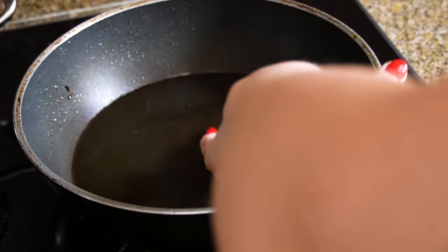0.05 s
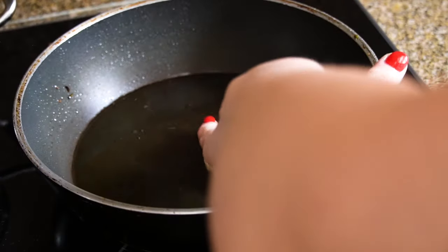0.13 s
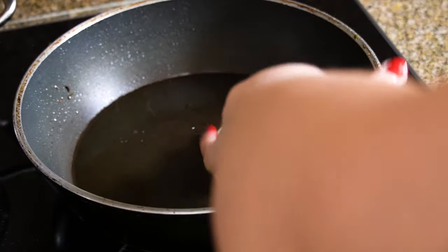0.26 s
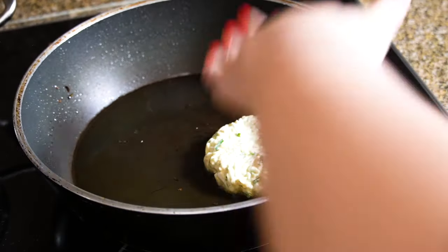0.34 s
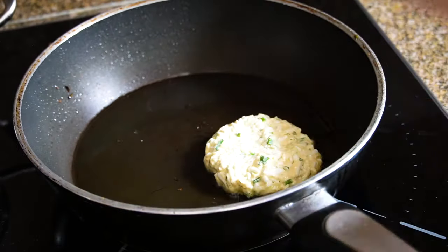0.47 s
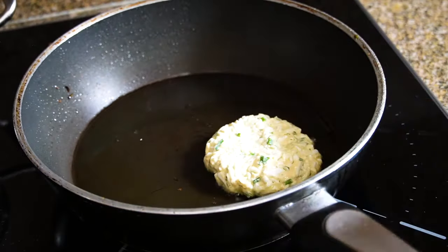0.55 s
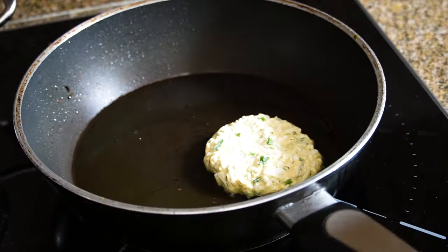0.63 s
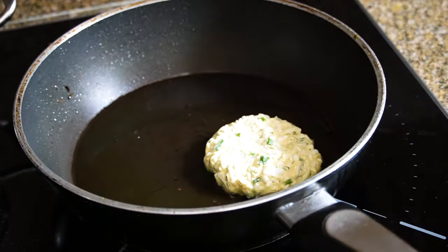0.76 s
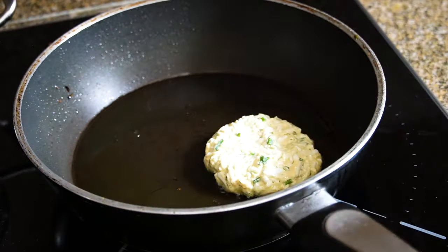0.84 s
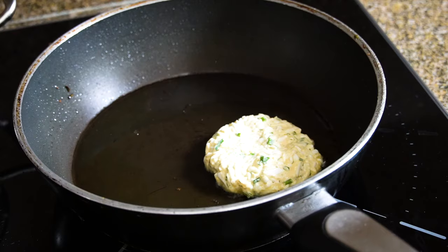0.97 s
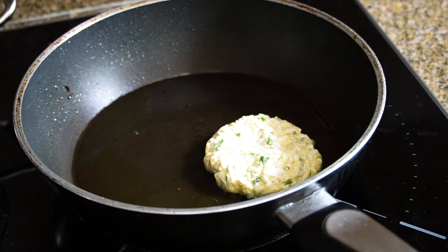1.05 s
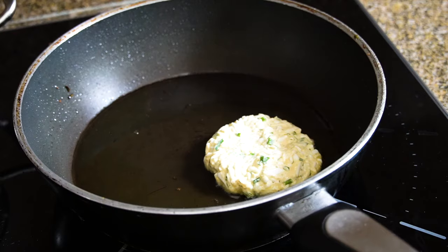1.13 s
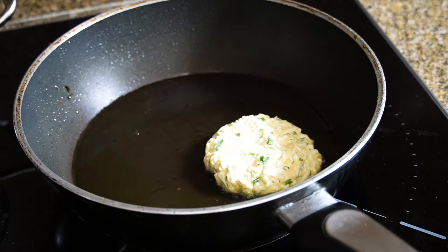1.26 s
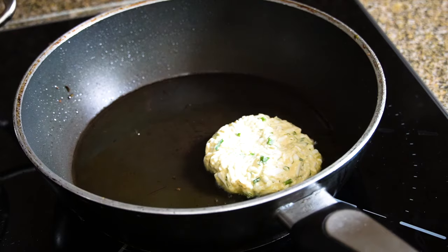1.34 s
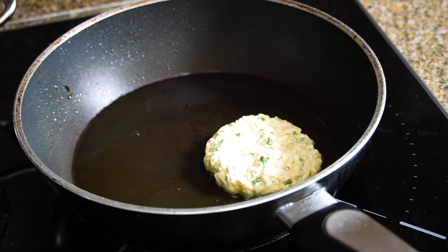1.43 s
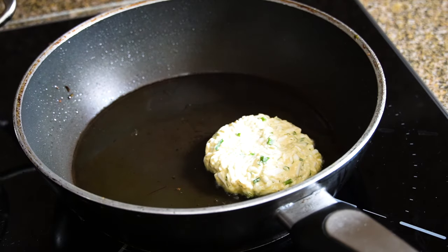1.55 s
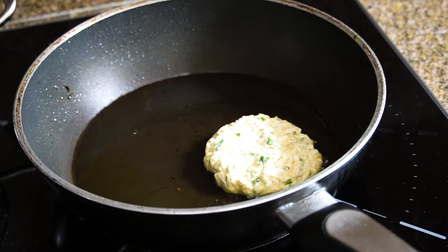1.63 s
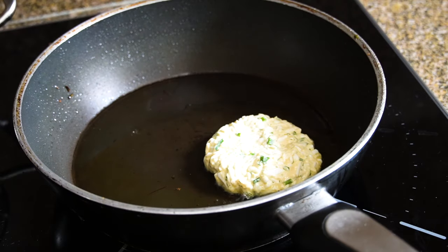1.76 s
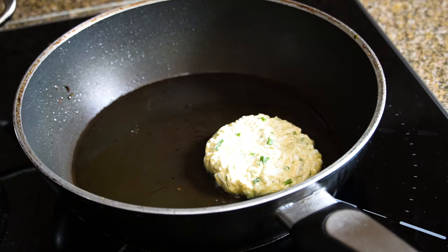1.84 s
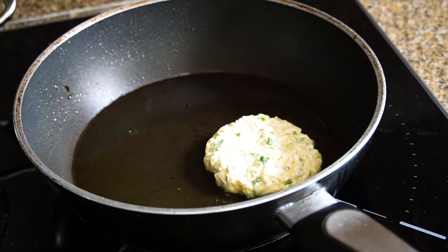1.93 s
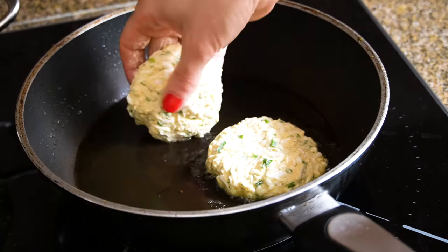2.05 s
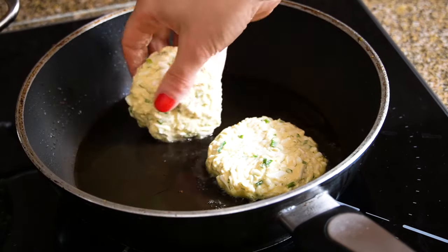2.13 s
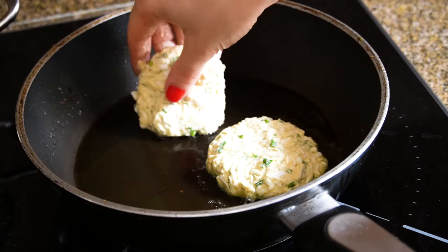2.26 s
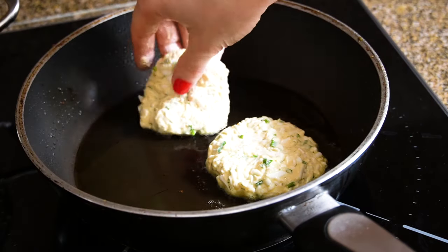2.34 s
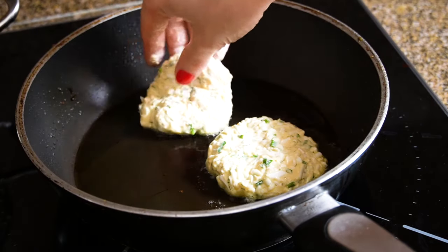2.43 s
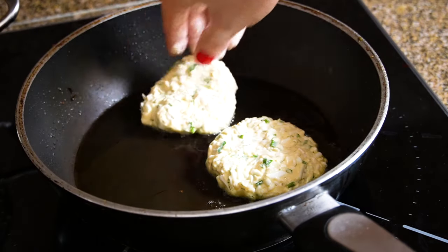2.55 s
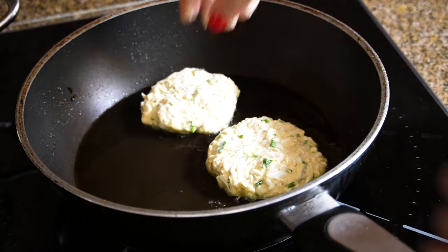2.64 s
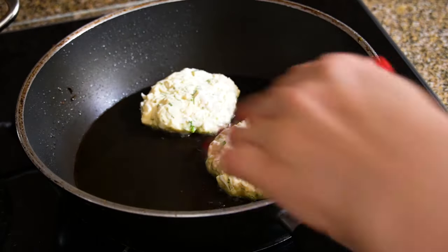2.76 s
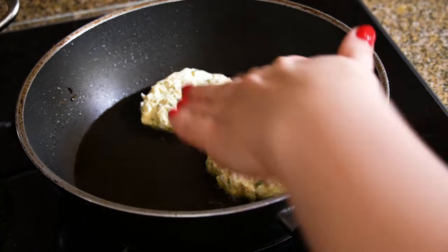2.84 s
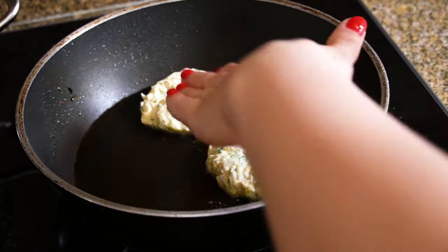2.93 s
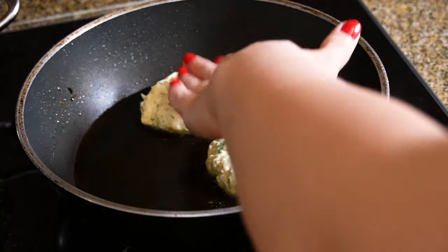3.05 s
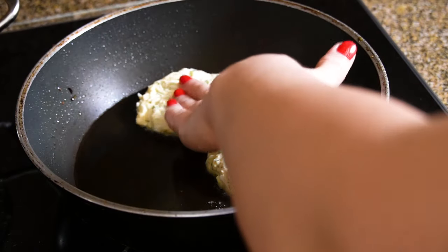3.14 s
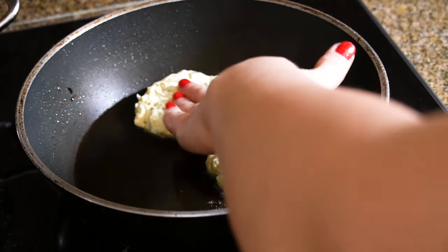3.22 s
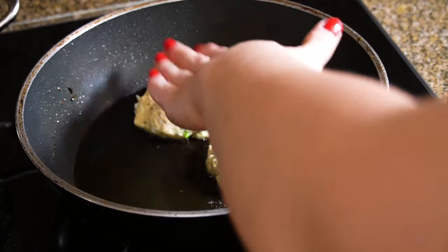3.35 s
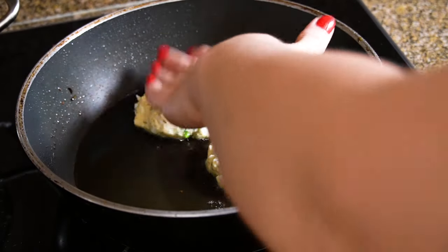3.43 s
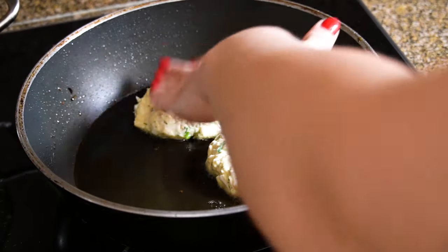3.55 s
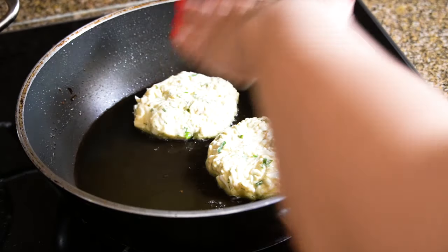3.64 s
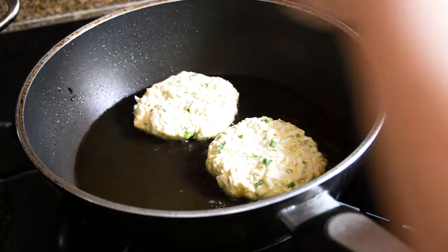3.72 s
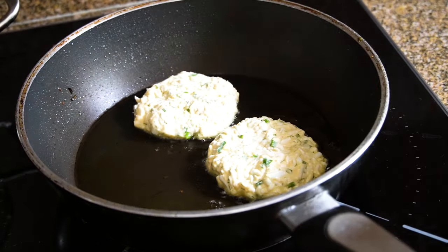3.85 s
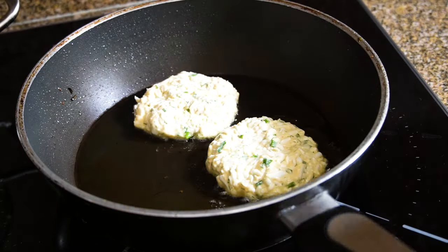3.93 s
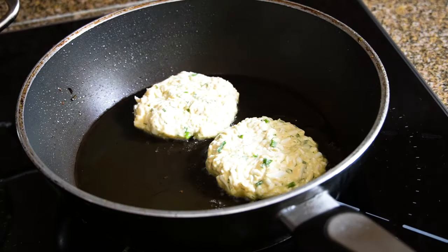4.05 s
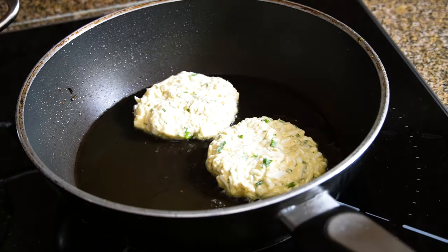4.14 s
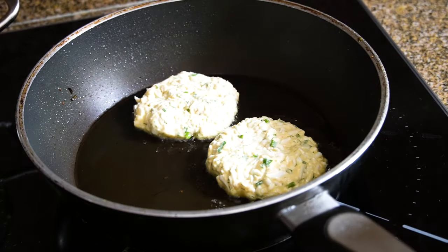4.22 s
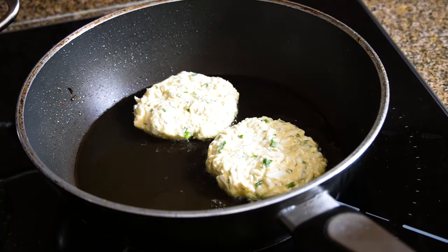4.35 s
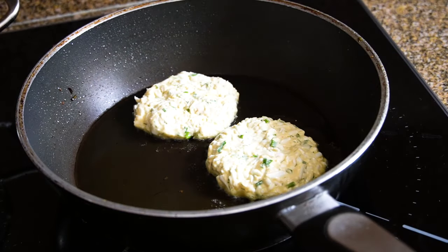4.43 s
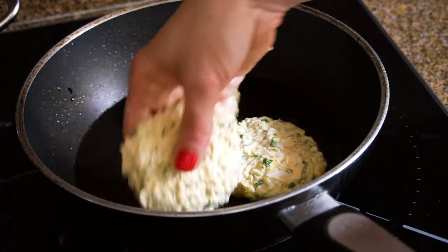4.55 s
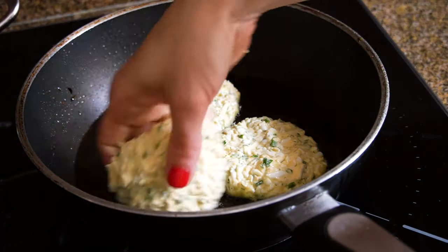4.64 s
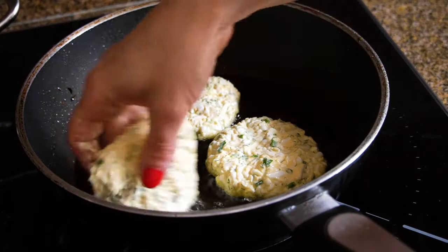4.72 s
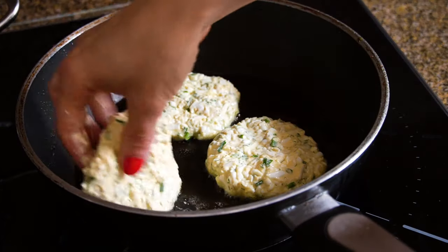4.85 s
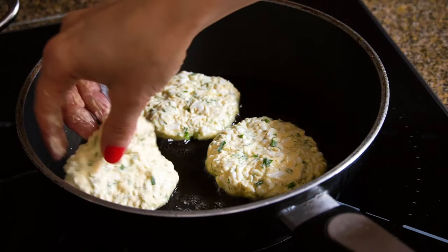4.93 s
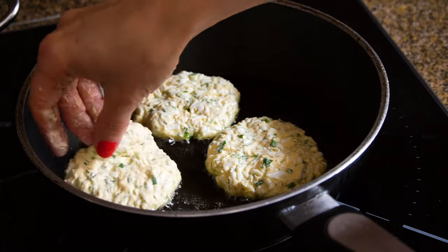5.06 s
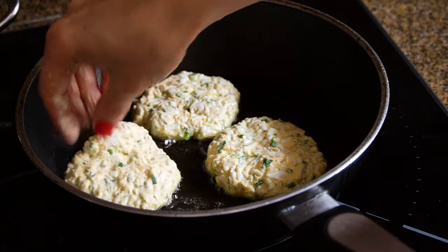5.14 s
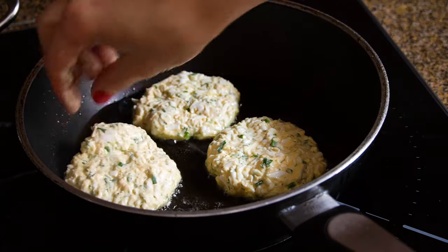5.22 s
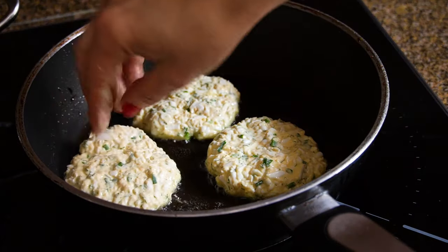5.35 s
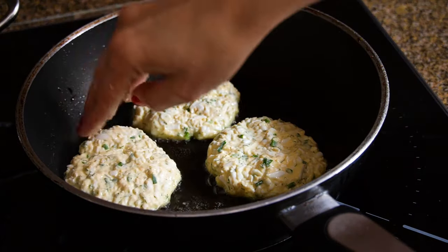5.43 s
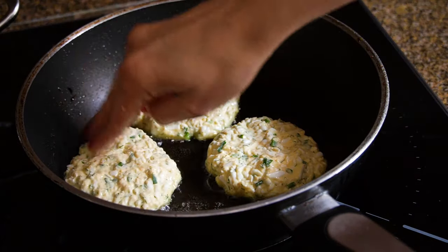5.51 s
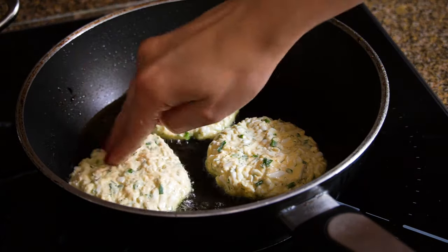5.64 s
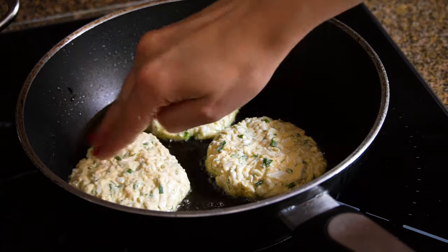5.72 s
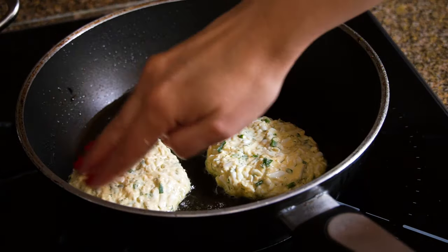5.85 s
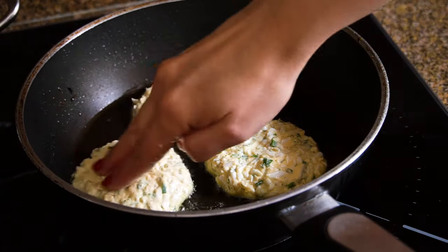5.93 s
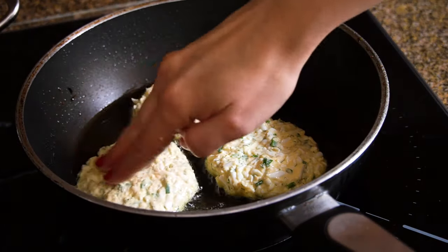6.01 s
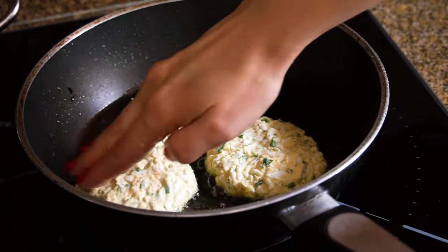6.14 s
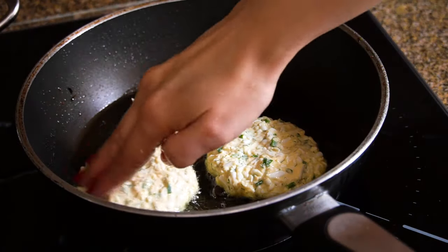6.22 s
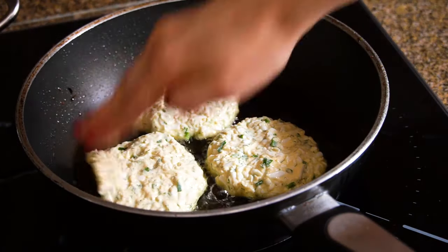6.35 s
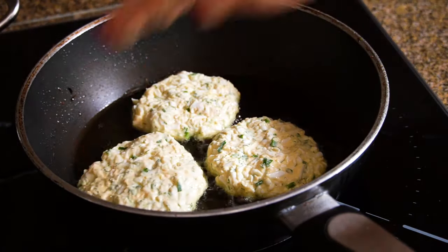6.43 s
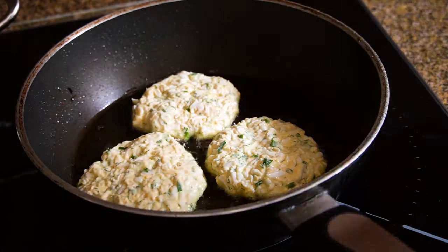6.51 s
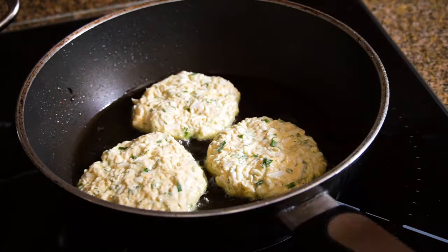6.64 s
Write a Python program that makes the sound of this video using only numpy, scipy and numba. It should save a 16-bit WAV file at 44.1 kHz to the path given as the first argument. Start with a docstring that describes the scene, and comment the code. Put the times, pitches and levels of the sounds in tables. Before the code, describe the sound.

Close to a pan on a home stove, wet patties fry in shallow oil. The sizzle starts strong, thins to a light fizz, then surges when a second and a third patty go in, with sharp spits and low bubbling gulps. A plate clinks once behind, dull counter knocks follow later, over faint low rumble.

```python
"""Patties frying, close microphone

Patties fry in shallow oil in a coated pan, close to a mono camera microphone. Steam bubbles are damped sines
in uneven gusts: a fine fizz that surges at each new patty, larger bubbles under the pressed food, and slow
gulps that ring the pan's modes. The biggest pops spit out singly as a note with bursts of noise. Further off,
a plate clinks and something knocks on the counter, both sums of decaying modes, over low rumble and room noise.
"""
import sys
import numpy as np
from scipy import signal
from scipy.fft import rfft, irfft, next_fast_len
from scipy.io import wavfile
from scipy.ndimage import map_coordinates
from numba import njit

SR = 44100
rng = np.random.default_rng(int(sys.argv[2]) if len(sys.argv) > 2 else 0)


def invert_db(level):
    """Linear amplitude ratio for a level in decibels (20 dB per decade), elementwise."""
    return 10 ** (np.asarray(level, dtype=float) / 20)


def transcribe(u):
    """Save the signal u as a 16-bit wav file named by the first command-line argument.

    u: samples, shape (n,) or (channels, n), limited to [-1, 1]; the rate is SR.
    q: integer samples, one column per channel.
    """
    v = np.clip(np.atleast_2d(u).T, -1, 1)
    q = np.round(v * 32767).astype(np.int16)
    wavfile.write(sys.argv[1], SR, q)


N = 294588

# tiny bubbles at the fresh wet surface, surging as each patty meets the oil: time_s, finest_db, small_db
FIZZ_LEVELS = [(0, -16, -21.5), (.25, -20.5, -21), (.6, -22.5, -24.5), (1.0, -26.5, -25.5),
               (1.43, -26, -29.5), (1.56, -23, -23.5), (1.7, -31, -27.5), (1.84, -26, -27),
               (1.97, -25, -29), (2.1, -31, -32), (2.18, -25.5, -28), (2.29, -18, -19.5), (2.4, -21, -16),
               (2.5, -18, -17.5), (2.65, -19, -18), (2.85, -19.5, -24), (3.0, -18.5, -20.5),
               (3.17, -13, -26), (3.32, -18.5, -23), (3.44, -19, -31), (3.62, -16.5, -25.5),
               (3.75, -21.5, -29.5), (4.04, -26.5, -27.5), (4.45, -26, -25), (4.71, -33, -33),
               (4.82, -31, -25), (4.89, -14.5, -19), (5.1, -17, -15), (5.5, -19, -20), (5.7, -22, -20),
               (5.85, -21.5, -17), (6.2, -25, -23), (6.46, -23, -17.5), (6.68, -24, -29)]


def unit(x):
    """Scale to rms 1."""
    return x / np.sqrt(np.mean(x ** 2) + 1e-20)


def along(points, hz):
    """Read (Hz, value) points on a log frequency axis."""
    f, v = np.transpose(points)
    return np.interp(np.log(hz + 1), np.log(f + 1), v)


def curves(rows):
    """One value per sample for each column after the time."""
    s, *columns = np.transpose(rows)
    return [np.interp(np.arange(N) / SR, s, column) for column in columns]


def wobble(rate):
    """A smooth random curve, rate knots a second."""
    return map_coordinates(rng.standard_normal(N // 100), [np.arange(N) * rate / SR])


def filtered(x, response):
    """Multiply the spectrum of x by a response, a function of frequency in Hz."""
    m = next_fast_len(N + SR // 2)
    return irfft(rfft(x, m) * response(np.fft.rfftfreq(m, 1 / SR)), m)[..., :N]


def hiss(spectrum):
    """Noise of rms 1 with this colour."""
    return unit(filtered(rng.standard_normal(N), lambda hz: invert_db(along(spectrum, hz))))


def resonance(f, centre, width, db):
    """Response of one damped mode, whose gain peaks at its centre frequency."""
    return invert_db(db) * 1j * f * width / (centre * centre - f * f + 1j * f * width)


@njit
def bursts(n, start, step, cycles, size, rise):
    """Sum of damped sines; step = cycles per sample, the pitch climbs as each bubble shrinks."""
    out = np.zeros(n)
    for i in range(len(start)):
        if step[i] > .45:  # too close to half the sample rate
            continue
        life = cycles[i] / step[i]
        for k in range(min(int(2 * life), n - start[i])):
            u = k / life
            swell = 4 * u * np.exp(1 - 4 * u)  # peaks at 1 a quarter of the way through the life
            out[start[i] + k] += size[i] * swell * np.sin(2 * np.pi * step[i] * k * (1 + rise * u))
    return out


def singles(s, db, hz, cycles):
    """Single bubbles at given moments."""
    return bursts(N, np.round(s * SR).astype(np.int64), hz / SR, cycles, invert_db(db), 0.0073)


def swarm(centre_hz, octaves, cycles, spread_db, gust_db, count, size):
    """Random streams of bubbles, rms 1: each steam vent opens suddenly and lets out a dying run of like bubbles."""
    vent = rng.integers(0, N, count)
    pitch = np.clip(rng.standard_normal((count, 1)), -1.7, 2.5)
    strength_db = np.minimum(spread_db * rng.exponential(size=count), 11) + gust_db[vent]
    late_s = .012 * rng.exponential(size=(count, size))  # after the vent opens
    hz_draw, gain_draw, life_draw = rng.standard_normal((3, count, size))
    hz = centre_hz[vent, None] * 2 ** (octaves * pitch + 0.062 * hz_draw)
    gain = invert_db(strength_db[:, None] - 64 * late_s + 0.63 * gain_draw)
    start = np.minimum(vent[:, None] + (late_s * SR).astype(np.int64), N - 1)
    life = cycles * 2 ** (0.59 * life_draw)
    return unit(bursts(N, start.ravel(), hz.ravel() / SR, life.ravel(), gain.ravel(), 0.05))


def spurts():
    """Steam breaks out at once and ebbs: sudden lifts in dB that die away."""
    per_s, mean_lift_db, ebb_s = 14, 2, 0.024
    chance, size = rng.random(N), rng.exponential(size=N)
    lifts = mean_lift_db * size * (chance < per_s / SR)
    return signal.lfilter([1], [1, -np.exp(-1 / (ebb_s * SR))], lifts)


def pan(x):
    """The resonances of the pan and the oil in it shift under the load of the food."""
    # modes before the third patty: centre_hz, width_hz, level_db
    lighter_modes = [(287, 13, -26), (367, 29, -11), (476.6, 4.2, 2), (694.5, 82, 0.5), (937, 120, -3),
                     (1287, 160, -1), (2010, 79, -30)]
    # modes with three patties in the pan: centre_hz, width_hz, level_db
    loaded_modes = [(290, 13, -29), (377, 27, -15), (499, 9.2, -0.5), (697, 67, 1), (964, 99, -4.5),
                    (1200, 130, 1), (2090, 79, -22)]
    full_s, settle_s = 4.8, .15  # the third patty weighs on the pan

    def ring(modes):
        # neighbouring modes move in opposite phase
        return unit(filtered(x, lambda f: sum((-1) ** k * resonance(f, *mode) for k, mode in enumerate(modes))))

    full = np.clip((np.arange(N) / SR - full_s) / settle_s, 0, 1)
    return (1 - full) * ring(lighter_modes) + full * ring(loaded_modes)


def rim(x):
    """The bubbling with the ring of the pan's wall added, rms 1."""
    # upper ring of the pan, level over the direct sound: centre_hz, width_hz, level_db
    wall_modes = [(2240, 74, -13.5), (2655, 39, -10), (2890, 72, -4.5), (3186, 62, -7), (3505, 99, -4),
                  (3736, 59, -10), (4020, 48, -8), (4850, 130, -12), (8080, 570, -16)]
    return unit(filtered(x, lambda f: 1 + sum(resonance(f, *mode) for mode in wall_modes)))


def frying():
    """All bubble sizes share the gusts of escaping steam; each fizz, bubble and gulp swarm also has its own."""
    # bubbles under the food, swelling while it is pressed down: time_s, larger_bubbles_db, big_bubbles_db, gulps_db
    under_levels = [(0, -17, -23, -20.5), (.2, -24, -24, -25), (.55, -21, -27, -27),
                    (.95, -25.5, -32.5, -31.5), (1.4, -27.5, -31, -32), (1.95, -31.5, -36, -34.5),
                    (2.3, -32.5, -39, -32.5), (2.5, -27, -42, -31), (2.75, -27, -30, -29.5),
                    (3.1, -20.5, -27, -27), (3.33, -20.5, -24, -27.5), (3.45, -23, -27.5, -28),
                    (3.8, -20.5, -30, -29.5), (4.2, -26.5, -38.5, -37), (4.45, -26.5, -35.5, -36),
                    (4.74, -40, -40, -32), (4.9, -30.5, -39.5, -33.5), (5.2, -29, -32, -28.5),
                    (5.55, -26.5, -33.5, -25.5), (5.9, -23, -33, -26.5), (6.25, -26.5, -32, -27.5),
                    (6.5, -24, -26, -25), (6.68, -26.5, -32, -27)]
    # middle pitches of two bubble sizes: time_s, larger_bubbles_hz, small_bubbles_hz
    bubble_pitches = [(0, 4060, 7360), (2.2, 3920, 6920), (2.5, 3970, 7630), (3.0, 4000, 8350),
                      (3.3, 3820, 8200), (3.8, 3996, 7800), (4.5, 4030, 7070), (4.9, 3400, 8100),
                      (5.2, 3390, 8220), (5.5, 3350, 7100), (5.85, 3630, 7540), (6.2, 3550, 7400),
                      (6.47, 3116, 7360), (6.68, 3630, 7100)]
    # colour of the smooth hiss of escaping steam: frequency_hz, density_db (per Hz)
    steam_colour = [(300, -60), (1000, -3), (2500, -2.5), (5500, 1.5), (10000, -4.5), (16000, -7.5)]
    finest_db, small_db = curves(FIZZ_LEVELS)
    bubble_db, big_db, gulp_db = curves(under_levels)
    bubble_hz, small_hz = curves(bubble_pitches)
    gust = 0.45 * wobble(17) + 0.8 * wobble(40) + spurts()  # dB

    def near(hz):
        return hz * 2 ** (0.056 * wobble(8))  # slow wander of the middle pitch, in octaves

    finest = swarm(near(12300), octaves=0.314, cycles=7.9, spread_db=1.0,
                   gust_db=gust + 1.0 * wobble(30), count=7000, size=7)
    small = swarm(near(small_hz), octaves=0.245, cycles=11.4, spread_db=3.0,
                  gust_db=0.88 * gust + 0.11 * wobble(28), count=3600, size=5)
    bubbles = swarm(near(bubble_hz), octaves=0.1856, cycles=18.7, spread_db=3.6,
                    gust_db=0.9 * gust + 0.48 * wobble(25), count=8000, size=6)
    big = swarm(near(2265), octaves=0.357, cycles=12.2, spread_db=0.18,
                gust_db=1.4 * gust + 0.16 * wobble(25), count=3000, size=4)
    gulps = swarm(near(986), octaves=0.507, cycles=3.27, spread_db=2.17,
                  gust_db=1.0 * gust + 1.0 * wobble(20), count=5000, size=3)
    gulps = unit(pan(gulps) + 0.039 * gulps)

    # the steam follows the two middle sizes
    steam_db = 2.0 + 0.3 * gust + 0.36 * small_db + 0.62 * bubble_db
    steam = invert_db(steam_db) * rim(hiss(steam_colour))
    surge = invert_db(0.32 * wobble(16))  # the fizz comes in waves
    # droplets snapping on the hot metal, set against the mean of the two fizz levels
    crackle = swarm(near(8340), octaves=0.37, cycles=3.4, spread_db=11.4,
                    gust_db=1.5 * gust, count=2500, size=2)
    crackle = invert_db(-6.5) * np.sqrt(invert_db(finest_db + small_db)) * crackle

    fizz = surge * (crackle + invert_db(finest_db) * finest + invert_db(small_db) * rim(small))
    under_food = invert_db(bubble_db) * rim(bubbles) + invert_db(big_db) * rim(big) + invert_db(gulp_db) * gulps
    return steam + fizz + under_food


def air():
    """Low air movement on the microphone and the kitchen's murmur of machines, as two coloured noises."""
    # levels: time_s, rumble_db, room_db
    air_levels = [(0, -24, -39.5), (.3, -27.5, -40.5), (.8, -31.5, -45), (1.35, -33, -45.5),
                  (1.51, -24.5, -40.5), (1.75, -37, -43.5), (2.06, -33, -42.5), (2.42, -23, -34.5),
                  (3.0, -28.5, -43.5), (3.72, -29.5, -42.5), (4.22, -35.5, -46), (4.52, -34, -44),
                  (4.7, -27, -35.5), (4.86, -25, -39), (5.02, -26, -54), (5.2, -25.5, -45.5),
                  (5.6, -25, -35), (5.92, -33, -42.5), (6.3, -28.5, -41.5), (6.68, -31, -40)]
    # colour of the rumble: frequency_hz, density_db (per Hz)
    rumble_colour = [(8.8, -43), (15, 0), (27, -1.5), (41, -4), (62, -11.5), (79, -20.5), (92, -11),
                     (108, -30.5), (140, -105), (180, -63), (310, -120)]
    # colour of the room noise: frequency_hz, density_db (per Hz)
    room_colour = [(65, -39), (110, 8), (225, -3.5), (319, 13.5), (403, -2.5), (455, 8), (600, 3),
                   (780, -41), (1320, -120)]
    rumble_db, room_db = curves(air_levels)
    waver_db = 2.5 * wobble(8)
    gusty_db = 1.6 * wobble(4.2)  # random swell of the rumble
    return invert_db(rumble_db + gusty_db) * hiss(rumble_colour) + invert_db(room_db + waver_db) * hiss(room_colour)


def strays():
    """Rows of smaller spits at random moments, whose level follows the small fizz around them."""
    count, over_fizz_db, spray_db = 240, 12, -24  # spray_db is relative to the spit
    low_hz, high_hz = 5000, 14000
    when, pitch, size = rng.random((count, 3)).T
    db = curves(FIZZ_LEVELS)[-1][(when * N).astype(int)] + over_fizz_db - 6 * size
    return np.transpose([when * N / SR, db, low_hz * (high_hz / low_hz) ** pitch, db + spray_db])


def spits():
    """A loud spit is a bubble note with a broad crack and a dying spray of droplets around its pitch."""
    # the loudest single spits, relative levels: start_s, level_db, pitch_hz, spray_db
    loud_spits = [(.2103, 2, 4800, -24), (.2198, -4, 13520, -26), (.2195, -5, 3700, -24),
                  (.3867, -6, 13700, -28), (.6414, -8, 14300, -25), (.908, -11, 6720, -22),
                  (1.598, -16, 5500, -21), (1.6044, -9, 9500, -22), (1.635, -20, 7000, -26),
                  (1.9535, -7, 13500, -23), (1.956, -18, 6000, -29), (1.9844, -13, 6370, -23),
                  (2.1851, -10, 7060, -25), (2.374, -5, 12920, -26), (2.4266, -2, 12000, -24),
                  (2.4268, -6, 7800, -26), (2.455, -7, 7600, -24), (2.5629, -4, 7410, -26),
                  (2.7494, -7, 13520, -21), (3.09, -6, 14000, -27), (3.1456, -5, 9040, -23),
                  (3.2455, -5, 13520, -27), (3.287, -5, 11000, -27), (3.373, -8, 13000, -22),
                  (3.538, -11, 4100, -26), (3.556, -10, 3700, -27), (3.6279, -3, 13520, -21),
                  (3.6959, -3, 4390, -30), (3.6961, -6, 12000, -28), (3.727, -7, 13800, -23),
                  (4.1041, -9, 4130, -30), (4.751, -10, 13180, -36), (4.7854, -6, 11630, -28),
                  (4.8049, -11, 7060, -31), (4.8362, -3, 8010, -25), (4.8474, -9, 7840, -20),
                  (4.8596, -7, 8180, -17), (4.8689, -7, 5200, -20), (4.88, -5, 5200, -19),
                  (4.9233, -5, 8100, -28), (4.9418, -3, 8530, -25), (4.9782, -3, 10080, -26),
                  (5.01, -5, 7000, -22), (5.1362, -1, 11800, -23), (5.1503, -3, 8100, -22),
                  (5.1871, -2, 12920, -24), (5.2014, -2, 6030, -25), (5.2199, -4, 5510, -22),
                  (5.3154, -5, 7060, -20), (5.3346, -3, 7240, -23), (5.4364, -6, 8270, -17),
                  (5.4929, -7, 11370, -18), (5.515, -6, 6000, -20), (5.5732, -5, 8270, -19),
                  (5.6662, -12, 3270, -27), (5.6745, -1, 10850, -25), (5.756, -9, 6000, -24),
                  (5.77, -9, 8800, -23), (5.779, -11, 3700, -26), (5.792, -8, 3900, -24),
                  (5.7863, -7, 5800, -23), (5.8311, -4, 8870, -25), (5.972, -10, 9200, -24),
                  (6.0231, -8, 7060, -24), (6.09, -13, 4400, -27), (6.3902, -9, 9730, -22),
                  (6.4665, 1, 8500, -19), (6.535, -11, 7500, -24)]
    t = np.arange(SR // 20) / SR
    noises = np.zeros(N + len(t))
    rows = np.vstack([loud_spits, strays()])
    for s, db, hz, spray_db in rows:
        noise = rng.standard_normal((2, len(t)))
        droplets = unit(signal.lfilter(*signal.iirpeak(hz, 3, SR), noise[0]))
        snap = unit(signal.lfilter(*signal.iirpeak(hz, 1.3, SR), noise[1]))
        crack = invert_db(db - 3 - 60 * t / 0.0086) * snap  # falls 60 dB in 8.6 ms
        spray = invert_db(spray_db + 6 - 60 * t / .07) * droplets
        noises[round(s * SR):][:len(t)] += crack + spray
    s, db, hz, _ = rows.T
    notes = singles(s, db + 3, hz, np.full(len(s), 4.5))
    return notes + noises[:N]


def deep_gulps():
    """Single deep gulps, each one damped bubble note."""
    # gulps, relative levels: start_s, level_db, pitch_hz, life_cycles
    gulp_rows = [(0.0675, 5.5, 790, 3.3), (0.073, -4.5, 1310, 23), (0.076, -9, 700, 5.3),
                 (0.2192, 7, 850, 2.6), (0.252, -9, 1355, 22), (0.345, -3, 687, 7.6),
                 (1.275, -4.5, 794, 11.5), (2.424, -5, 1200, 6.5), (3.285, -7, 800, 8), (3.3, -3, 976, 16),
                 (3.32, -12, 1500, 9.1), (3.335, -10, 1900, 12), (4.208, -14, 900, 30),
                 (4.468, -2.5, 525, 7.2), (4.924, -8, 1220, 10), (5.184, -5, 645, 7.6),
                 (6.464, -5, 1240, 11), (6.57, -1, 720, 6.1)]
    return invert_db(-11.0) * singles(*np.transpose(gulp_rows))


def struck(hits, modes, gain_db, crack_db, crack_t60, rattle, crack_hz):
    """Each contact cracks and rings the object's modes; loose contact makes each mode waver in phase."""
    out, t = np.zeros(N + SR), np.arange(SR // 3) / SR
    build = 1 - np.exp(-t / .0005)  # the contact takes about half a millisecond to build
    for s, db in hits:
        ring = 0
        for hz, level, t60 in modes:
            drift = rattle * np.cumsum(rng.standard_normal(len(t)))  # radians
            ring = ring + invert_db(level - 60 * t / t60) * np.sin(2 * np.pi * hz * t + drift)
        body = unit(signal.lfilter(*signal.iirpeak(crack_hz, 1.6, SR), rng.standard_normal(len(t))))
        crack = invert_db(crack_db - 60 * t / crack_t60) * body
        out[round(s * SR):][:len(t)] += invert_db(db + gain_db) * build * (ring + crack)
    return out[:N]


def counter_knocks():
    """Dull knocks ring the counter's low, quickly damped modes."""
    # knocks, relative levels: start_s, level_db
    knock_hits = [(.068, -19), (.219, -39), (4.466, -16.5), (4.537, -12), (4.5445, -12), (4.556, -27)]
    # counter modes: pitch_hz, level_db, t60_s
    counter_modes = [(215, -3, .07), (270, 3, .09), (388, 3, .1), (442, 3, .07), (530, 1, .04),
                     (620, 2, .06), (760, -1, .07), (1080, -6, .05), (1200, -10, .04)]
    return struck(knock_hits, counter_modes, gain_db=-12, crack_db=-25, crack_t60=.008, rattle=0.069, crack_hz=3000)


def vents():
    """The strongest steam vents each whistle a run of like bubbles, thickest at the start."""
    # vents, relative levels: start_s, length_s, level_db, pitch_hz
    vent_rows = [(0.113, 0.036, -19, 4500), (1.317, 0.016, -22.5, 4860), (1.321, .03, -22, 4200),
                 (1.607, 0.014, -19, 9300), (1.606, 0.016, -19, 6800), (1.608, 0.023, -23, 5400),
                 (1.98, 0.024, -21.5, 6200), (2.283, .014, -18, 8000), (2.42, 0.015, -17, 8150),
                 (2.488, .012, -23, 6200), (2.659, 0.016, -18, 7060), (2.672, 0.011, -17, 13780),
                 (3.116, 0.031, -23, 3960), (3.263, 0.019, -19, 4000), (3.316, 0.025, -16, 3210),
                 (3.357, 0.019, -17, 4230), (3.536, .025, -19, 3750), (3.562, 0.014, -18, 12230),
                 (4.859, 0.043, -26, 5340), (4.86, 0.027, -13, 8350), (4.996, 0.028, -16, 6200),
                 (5.043, .013, -16, 11890), (5.12, 0.021, -19, 12000), (5.131, 0.027, -19, 7960),
                 (5.215, 0.015, -17, 5300), (5.31, 0.034, -22, 7200), (5.438, .02, -15, 8150),
                 (5.48, 0.021, -23, 12230), (5.505, 0.023, -18, 6000), (5.573, .012, -17, 8140),
                 (5.581, 0.011, -18.5, 6000), (5.63, 0.012, -19, 4900), (5.763, 0.034, -22, 3700),
                 (5.866, 0.026, -19.5, 3850), (5.896, 0.0086, -17, 6460), (5.907, 0.0093, -19, 4900),
                 (6.022, .01, -16, 5900), (6.39, 0.015, -18, 4200), (6.452, 0.047, -24, 2900)]
    spread_oct, life_cycles, scatter_db, count = 0.039, 11.5, 3.5, 26  # bubbles within one run
    out = np.zeros(N)
    for s, length, db, hz in vent_rows:
        late = rng.random(count)
        pitch, size = rng.standard_normal((2, count))
        run = singles(s + length * late ** 2.0, scatter_db * size, hz * 2 ** (spread_oct * pitch),
                      np.full(count, life_cycles))
        out += invert_db(db) * np.sqrt(length * SR) * run / np.linalg.norm(run)  # level as rms over the length
    return out


def plate_clinks():
    """Plate contacts crack sharply and ring many bright modes."""
    # contacts, relative levels: start_s, level_db
    clink_hits = [(1.4752, 1), (1.598, -19)]
    # plate modes: pitch_hz, level_db, t60_s
    plate_modes = [(420, -18, .35), (470, -20, .2), (960, -17, .2), (1039, -12, .3), (1090, -14, .22),
                   (1150, 0, .035), (1230, -15, .25), (1324, -15, .35), (1475, -20, .3), (1800, -20, .2),
                   (1868, -13, .33), (1920, -18, .2), (2200, -17, .1), (2929, -19, .15), (3300, 4, .018),
                   (3435, -15, .2), (3650, -17, .15), (3908, -17, .25), (4011, -9, .33), (4732, -15, .4),
                   (4950, 8, .02), (5356, -8, .19), (5615, -18, .3), (6853, -13, .3), (7278, -13, .1),
                   (7655, -17, .4), (8457, -12, .08), (9119, -20, .25), (10200, -19, .12)]
    return struck(clink_hits, plate_modes, gain_db=-7, crack_db=7, crack_t60=.014, rattle=.033, crack_hz=4300)


def kitchen(x):
    """Each frequency of the room's answer, a burst of noise, dies at its own speed."""
    # decay of the room: frequency_hz, t60_s
    room_decay = [(300, 0.33), (2000, 0.55), (10000, 0.2)]
    hz, t, z = signal.stft(rng.standard_normal(SR // 2), SR, nperseg=256)
    tail = signal.istft(z * invert_db(-60 * t / along(room_decay, hz)[:, None]), SR, nperseg=256)[1]
    delayed = np.pad(x, (300, 0))  # samples before the room answers
    return signal.fftconvolve(delayed, tail / np.linalg.norm(tail))[:N]


def scene():
    """The pan is near; plate and counter are further off and wetter."""
    near = frying() + spits() + deep_gulps() + vents()
    far = plate_clinks() + counter_knocks()
    mono = near + far + invert_db(-13) * kitchen(near) + invert_db(-4.5) * kitchen(far) + air()
    return np.array([mono, mono])


def low_pass(x):
    """Removes everything above the highest recorded frequency."""
    return signal.sosfilt(signal.butter(12, 17030, fs=SR, output="sos"), x)


def record(dry):
    """Microphone colour, hard clipping at full scale, then a band limit."""
    # microphone response: frequency_hz, gain_db
    mic_response = [(300, -6), (1500, -3), (2500, -3.5), (3600, -6), (4700, -4.5), (6000, -5), (8200, -5),
                    (10300, -3.5), (12100, -2.5), (14000, -1), (16000, -0.5)]
    top_hz, edge_hz = 15870, 160  # band limit and the width of its edge
    clipped = np.clip(filtered(dry, lambda hz: invert_db(along(mic_response, hz))), -1, 1)
    mix = filtered(clipped, lambda hz: np.clip((top_hz - hz) / edge_hz, 0, 1) ** 2)
    return low_pass(mix)


dry = scene()
out = record(dry)
transcribe(out)
```